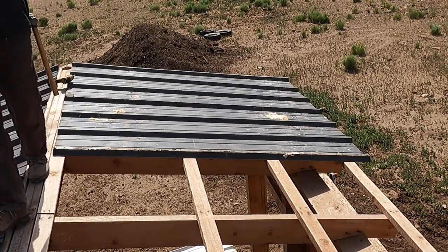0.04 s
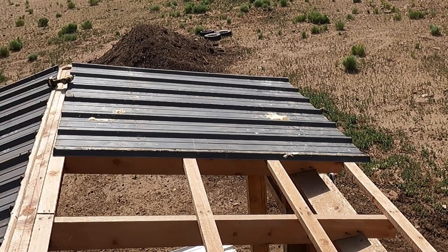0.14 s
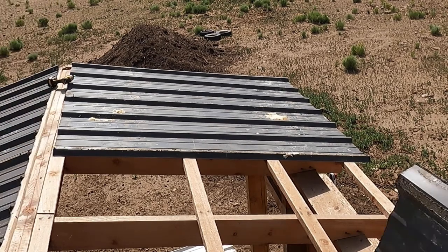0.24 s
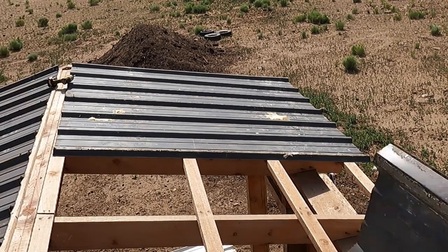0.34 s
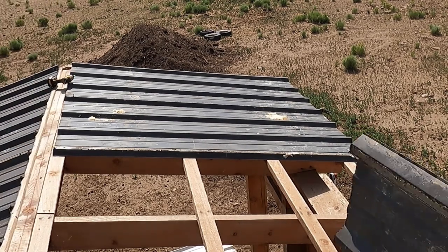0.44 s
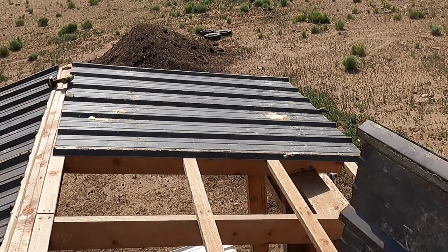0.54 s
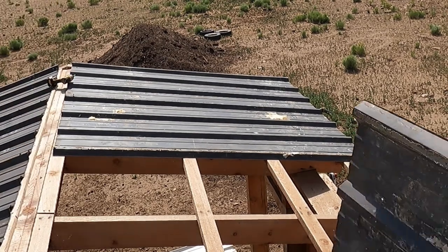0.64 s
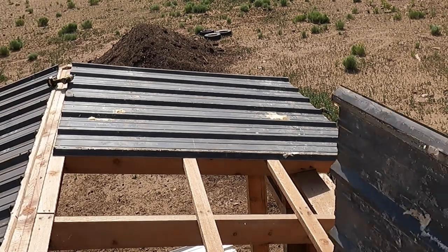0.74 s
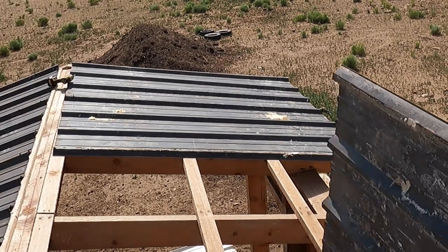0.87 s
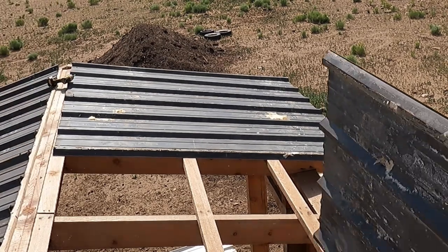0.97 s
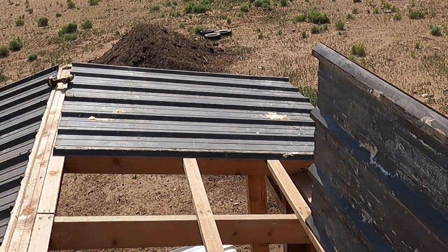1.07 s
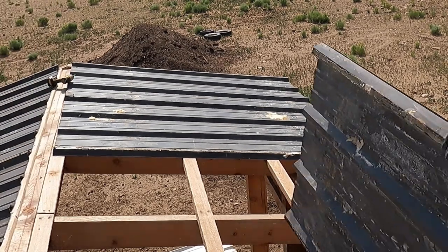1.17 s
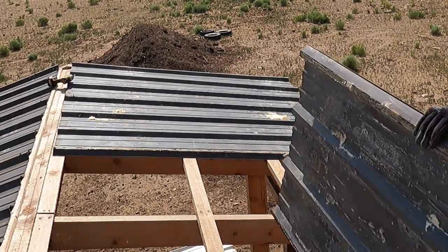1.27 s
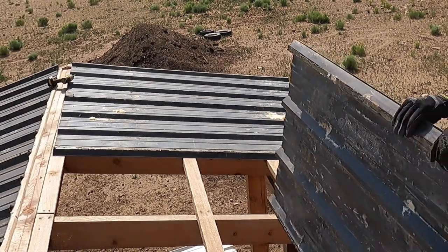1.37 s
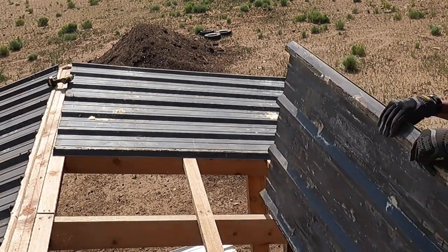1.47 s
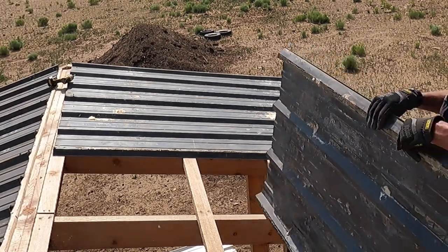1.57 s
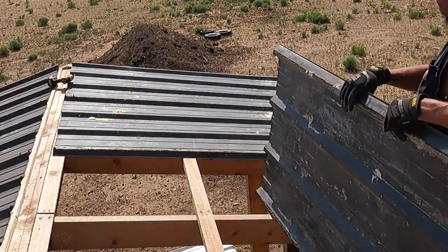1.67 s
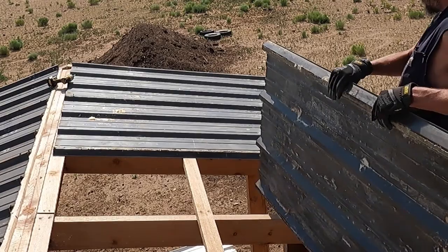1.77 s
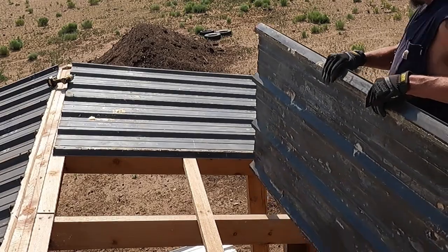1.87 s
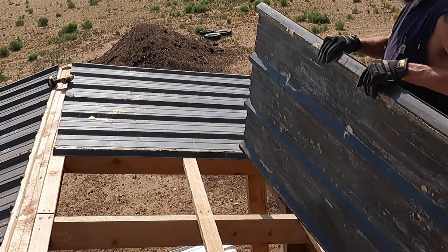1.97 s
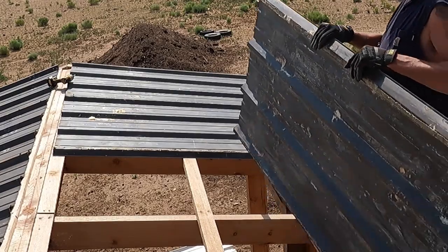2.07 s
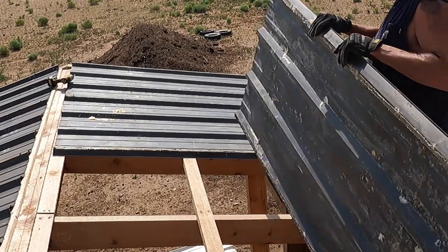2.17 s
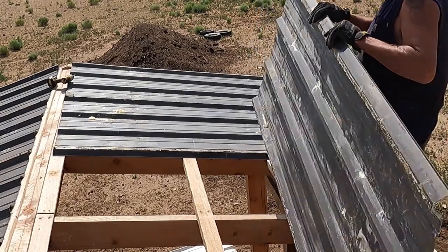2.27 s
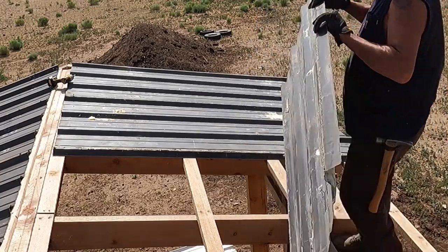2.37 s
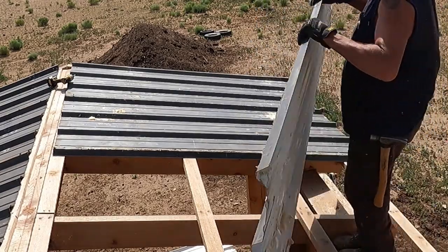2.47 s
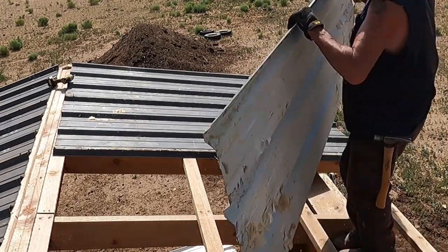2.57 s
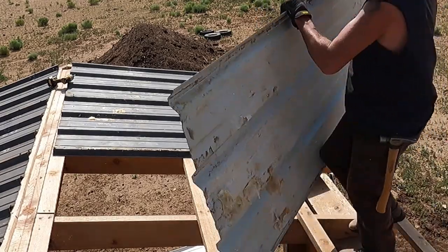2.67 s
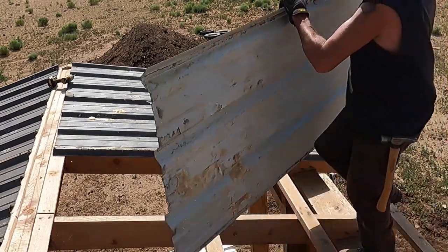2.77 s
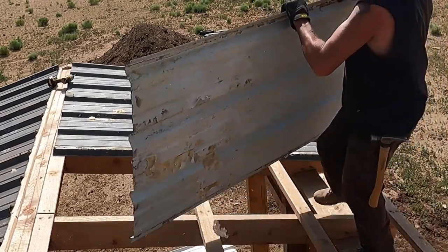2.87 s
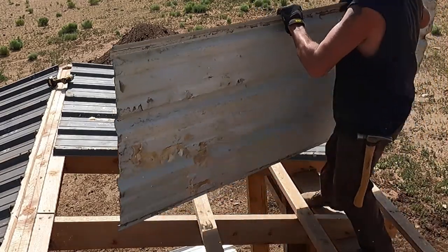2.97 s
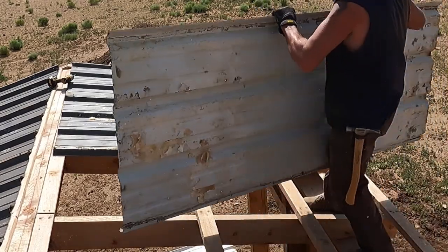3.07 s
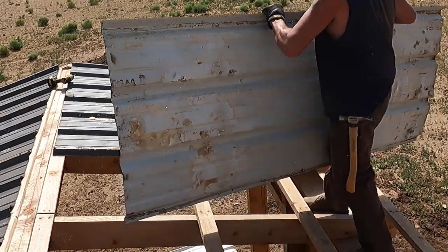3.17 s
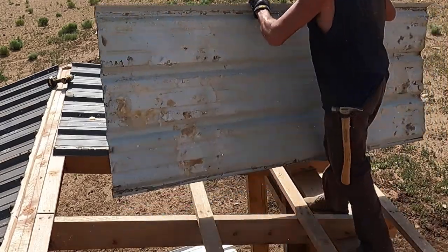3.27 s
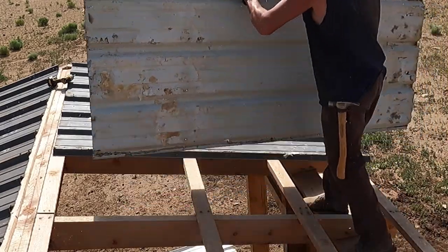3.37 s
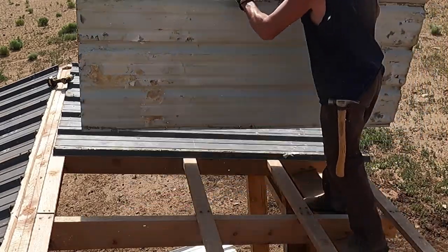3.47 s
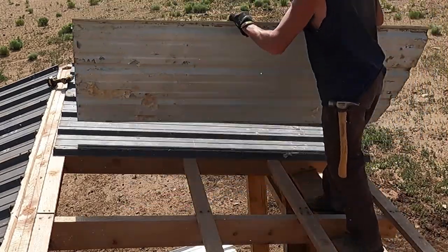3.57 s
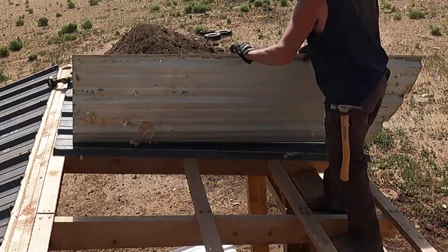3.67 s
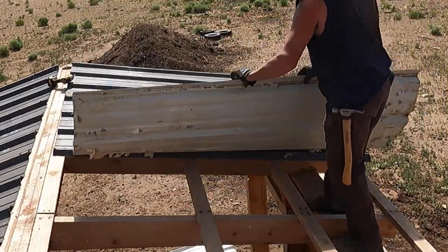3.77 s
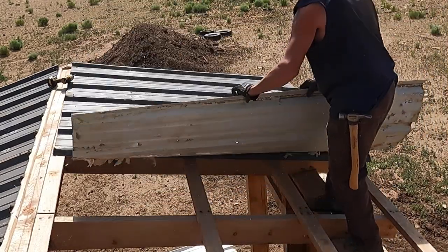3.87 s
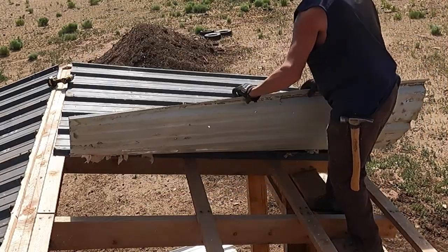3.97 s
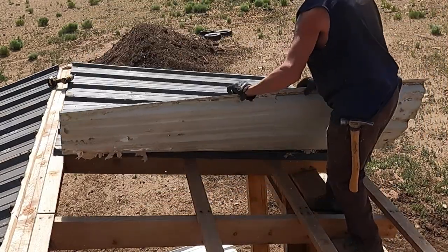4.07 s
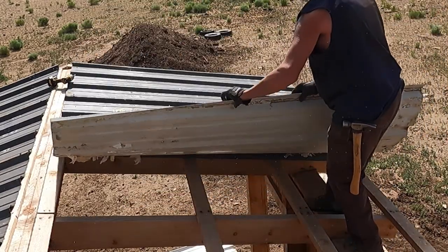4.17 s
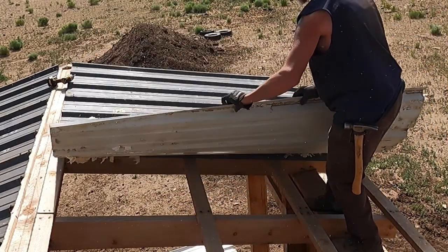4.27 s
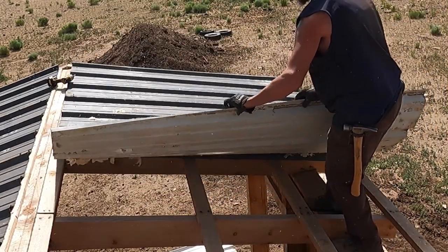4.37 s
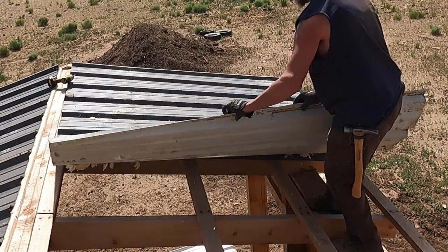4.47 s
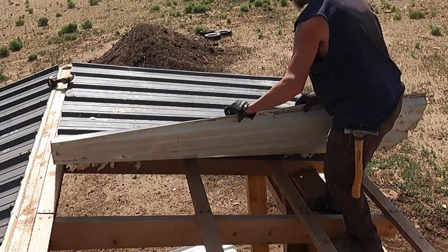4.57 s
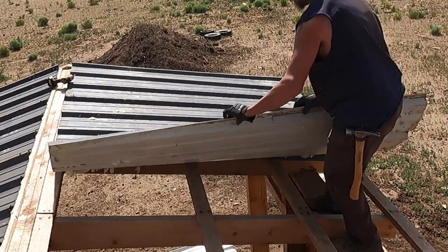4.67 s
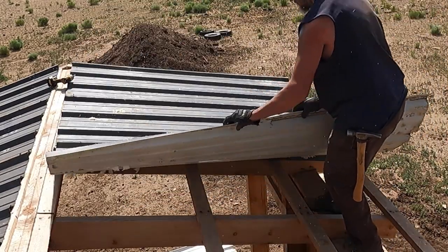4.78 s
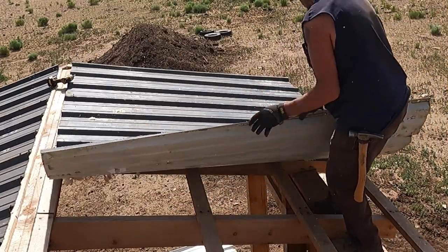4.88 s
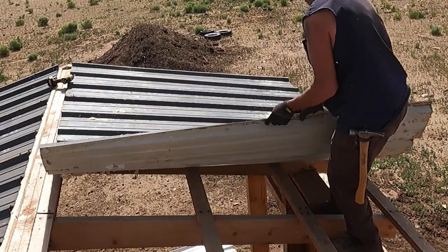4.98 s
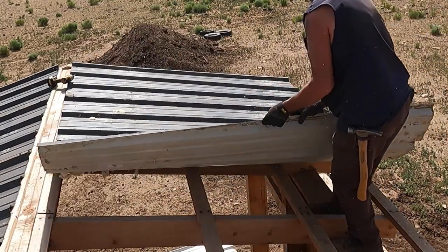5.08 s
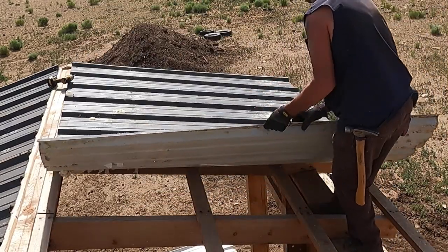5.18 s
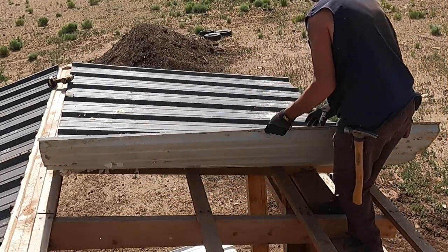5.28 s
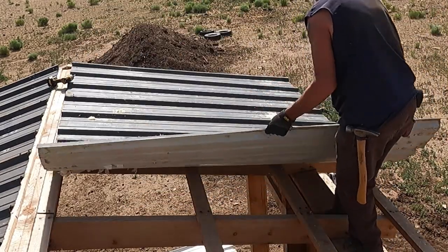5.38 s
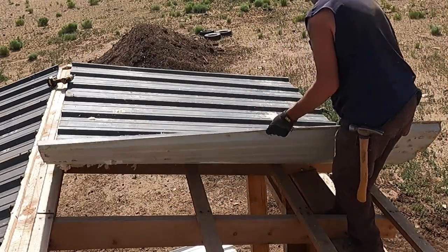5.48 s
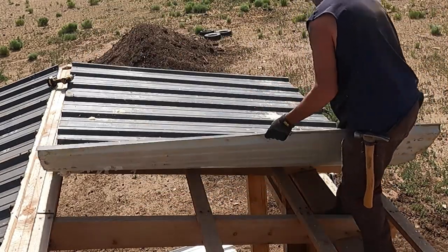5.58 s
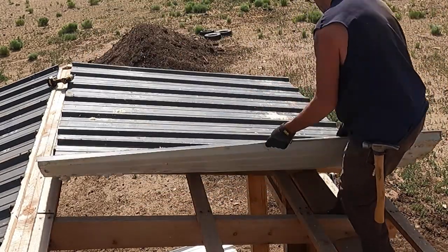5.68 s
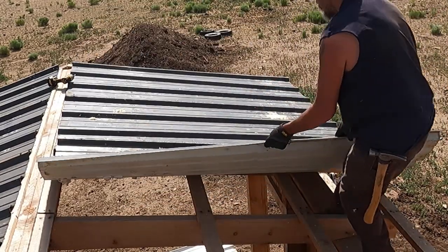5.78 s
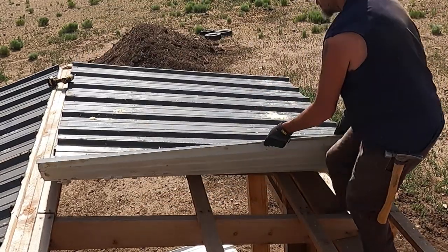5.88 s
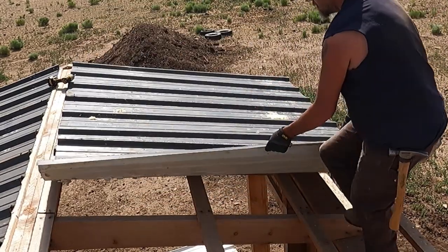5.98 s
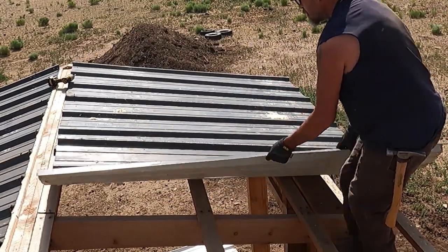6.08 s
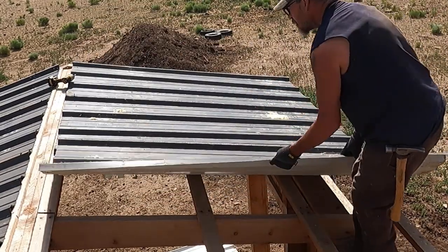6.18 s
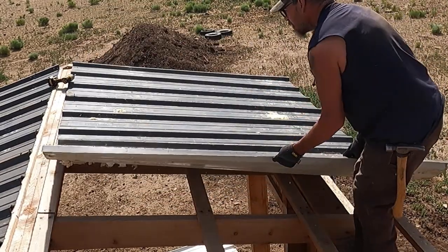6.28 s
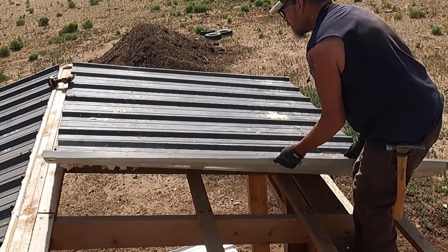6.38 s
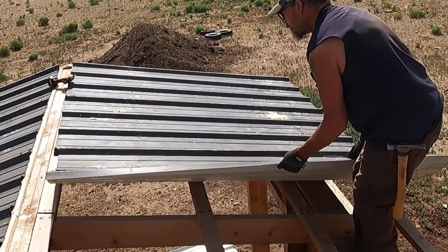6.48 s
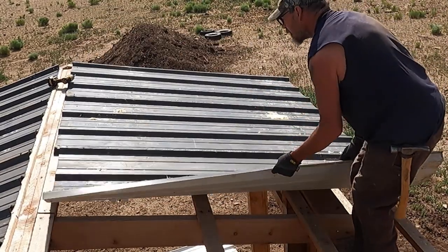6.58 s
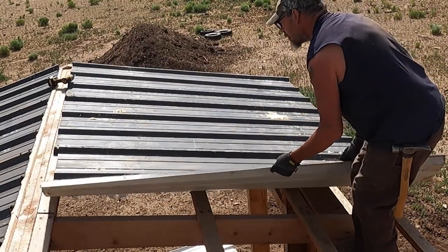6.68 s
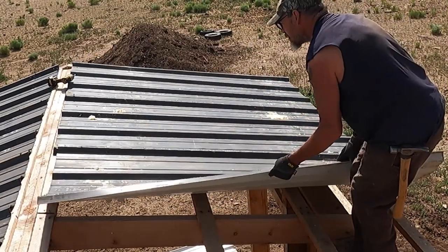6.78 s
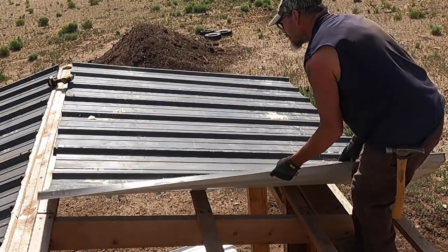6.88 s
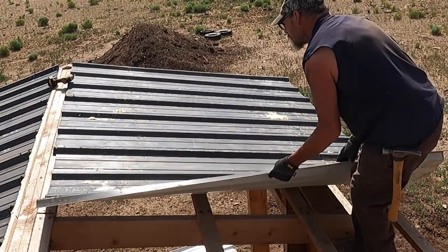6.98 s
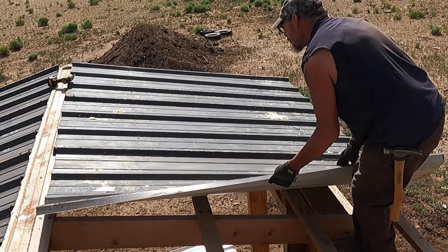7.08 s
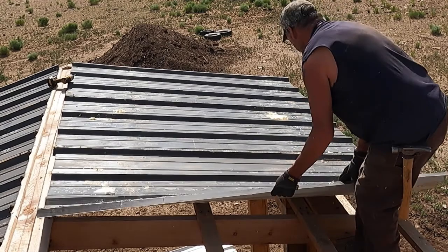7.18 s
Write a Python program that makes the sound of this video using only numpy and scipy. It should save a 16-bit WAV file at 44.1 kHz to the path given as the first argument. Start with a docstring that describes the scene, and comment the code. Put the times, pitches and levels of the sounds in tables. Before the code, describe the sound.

A thin ribbed metal sheet is handled outdoors on a timber frame. It opens with light tinny rattles and a scrape, then a hollow ringing wobble. After a quieter turn it slams down in a cluster of bright clanks with a tiny shrill squeal, then scrapes into place with dull wooden knocks and a late damped clatter. Low wind gusts rumble against the close microphone over faint open air.

```python
"""Steel roofing sheet manhandled onto a roof

A thin ribbed steel sheet is lifted, swung round, dropped on a roof and pushed into place, outdoors.
Blows excite a random crowd of bending modes plus a few strong ones, more or less damped from blow
to blow. Sliding drives the same modes with friction grains; squeal and whistles are unsteady sines.
Knocks, boots and short rasps are resonant noise; wind and open air are shaped noise."""
import sys
import numpy as np
from scipy import signal
from scipy.fft import rfft, irfft, next_fast_len
from scipy.io import wavfile
from scipy.ndimage import uniform_filter1d, map_coordinates

SR = 44100
rng = np.random.default_rng(int(sys.argv[2]) if len(sys.argv) > 2 else 0)


def materialize(psi):
    """Save the field psi as 16-bit PCM at rate SR to the path in sys.argv[1].

    A 1-D psi becomes a single channel; in a 2-D psi each row is a channel.
    """
    bounded = np.clip(np.atleast_2d(psi).T, -1, 1)
    quanta = np.round(bounded * 32767).astype(np.int16)
    wavfile.write(sys.argv[1], SR, quanta)


N = 319284
TIME = np.arange(N) / SR  # s

# spectrum of the sheet's crowd of weaker modes: pitch_hz, relative density_db (dB per Hz)
STEEL_SPECTRUM = [(50, -18), (130, -12), (280, -3.5), (550, 1), (1200, 1), (2500, -4), (3700, -9),
                  (4800, -12.5), (6500, -14), (10000, -23.5), (15500, -29.5)]


def amp(db):
    """Turns decibels into a gain."""
    return 10 ** (np.asarray(db) / 20)


def unit(x):
    """Scales to rms 1."""
    return x / np.sqrt(np.mean(x ** 2) + 1e-20)


def read(points, hz):
    """Reads a table on a log-frequency axis."""
    f, value = np.transpose(points)
    return np.interp(np.log(hz + .1), np.log(f), value)


def follow(rows):
    """Gives a curve's columns at every sample, then a gate that is open while it lasts."""
    s, *columns = np.transpose(rows)
    gate = np.clip(np.minimum(TIME - s[0], s[-1] - TIME) / 0.02 + 1, 0, 1)  # 20 ms fades outside the curve
    return [np.interp(TIME, s, column) for column in columns] + [gate]


def add(mix, start_s, sound):
    """Mixes a sound in at its start time, cut at the end of the scene."""
    part = mix[round(start_s * SR):][:len(sound)]
    part += sound[:len(part)]


def colour(x, spectrum):
    """Filters x by a spectrum table, at rms 1."""
    size = next_fast_len(len(x))
    gain = amp(read(spectrum, np.fft.rfftfreq(size, 1 / SR)))
    return unit(irfft(rfft(x, size) * gain, size)[:len(x)])


def drift(rate_hz):
    """Smooth random wander of rms 1, with little movement faster than about rate_hz."""
    size = next_fast_len(N)
    fade = np.exp(-(np.fft.rfftfreq(size, 1 / SR) / rate_hz) ** 2)
    return unit(irfft(rfft(rng.standard_normal(size)) * fade, size)[:N])


def steady(x):
    """Evens out the chance swells of a low noise."""
    power = uniform_filter1d(uniform_filter1d(x ** 2, SR // 8), SR // 16)
    return x / np.sqrt(power + .05)


def contacts(size, per_s, spread_db):
    """Tiny random impacts of uneven strength and either sign."""
    strength = amp(spread_db * np.minimum(rng.exponential(1, size), 4))
    sizes = strength * rng.choice([-1., 1.], size)
    return sizes * (rng.random(size) < per_s / SR)


def resonate(x, hz, sharpness):
    """Passes x through one resonance, at rms 1."""
    b, a = signal.iirpeak(hz, max(sharpness, 1), SR)
    return unit(signal.lfilter(b, a, x))


def tone(rows, jitter, jitter_hz, flutter_db):
    """An unsteady sine on a pitch and level curve; its pitch and level wander separately."""
    hz, db, gate = follow(rows)
    turns = np.cumsum(hz * (1 + jitter * drift(jitter_hz))) / SR
    level = gate * amp(db + flutter_db * drift(jitter_hz))
    return level * np.sqrt(2) * np.sin(2 * np.pi * turns)


def wind(eddy_db=6.5, buffet_db=-18, lump_db=1.6, levelling=0.79, buffet_growth=0.77):
    """Eddies push on the microphone in uneven lumps; strong wind breaks into finer buffeting."""
    # strength of the wind: time_s, strength_db
    gusts = [(0.0, -22.5), (0.13, -38.5), (0.28, -13.5), (0.47, -30.5), (0.6, -17.5), (0.83, -15.5),
             (0.97, -30.5), (1.3, -43.5), (1.68, -36), (2.35, -52), (2.8, -23.5), (3.25, -27),
             (3.45, -33.5), (4.1, -23.5), (5.27, -36), (5.45, -20.5), (5.9, -34), (6.3, -20), (6.7, -21.5),
             (7.24, -38.5)]
    # slow eddies: pitch_hz, relative density_db (dB per Hz)
    eddy_spectrum = [(1.5, -43), (5, 13), (15, 1.5), (24, -5), (41, -12), (70, -44.5), (140, -43),
                     (300, -78.5), (900, -100)]
    # finer buffeting of strong gusts: pitch_hz, relative density_db (dB per Hz)
    buffet_spectrum = [(30, -21), (60, 7.5), (100, -8.5), (160, -14), (300, -22), (800, -42), (3000, -73)]
    breakup_db = -20  # above this strength the eddies level off and the buffeting grows
    strength_db, _ = follow(gusts)
    excess_db = np.maximum(strength_db - breakup_db, 0)
    eddies = steady(colour(rng.standard_normal(N), eddy_spectrum))
    buffet = steady(colour(rng.standard_normal(N), buffet_spectrum))
    flow = amp(eddy_db - levelling * excess_db) * eddies
    flow += amp(buffet_db + buffet_growth * excess_db) * buffet
    return amp(strength_db + lump_db * drift(rate_hz=12)) * flow


def open_air(level_db=-59.0, waver_db=0.8):
    """Outdoor background: shaped noise whose level wavers slightly."""
    # spectrum of the air: pitch_hz, relative density_db (dB per Hz)
    air_spectrum = [(40, -2.5), (150, 3.5), (400, 2.5), (1000, -3), (2500, -8), (4000, -14.5), (8000, -21),
                    (15000, -26.5)]
    air = colour(rng.standard_normal(N), air_spectrum)
    return amp(level_db) * air * amp(waver_db * drift(rate_hz=8.6))


def sheet_modes(modes_per_hz=.11, uneven_db=2.5):
    """Short-time spectra of the sheet's crowd of modes, all sounding without loss."""
    hz = np.fft.rfftfreq(2 * SR, 1 / SR)
    place = np.arange(len(hz)) * modes_per_hz / 2
    spacing = np.cumsum(rng.uniform(.3, 1.7, len(hz)))
    # a plate's modes lie about evenly in frequency
    present = np.diff(np.searchsorted(spacing, place), prepend=0)
    strength = amp(uneven_db * rng.standard_normal(len(hz)))
    lines = present * strength * np.exp(2j * np.pi * rng.random(len(hz)))
    endless = colour(irfft(lines), STEEL_SPECTRUM)[:SR * 3 // 2]
    return signal.stft(endless, SR, nperseg=512)


def damped(t60, ring, evenness=0.26):
    """Scales decay times: ring above 1 lengthens, below 1 shortens, most for the longest-ringing modes."""
    return t60 * ring ** (t60 ** evenness)


def sheet_ring(crowd, ring, flash_db=-1, flash_s=0.029, crack_db=2, crack_s=0.0035):
    """The crowd's answer to one tap, each pitch dying at its own damped rate."""
    # decay of the crowd at ring 1: pitch_hz, t60_s
    crowd_decay = [(150, 1.4), (530, 2.27), (1300, 0.93), (1900, 0.82), (2800, 0.51), (5000, 0.5),
                   (9000, 0.36), (15000, 0.84)]
    hz, t, z = crowd
    t60 = damped(read(crowd_decay, hz), ring)
    out = signal.istft(z * amp(-60 * t / t60[:, None]), SR, nperseg=512)[1]
    out = out[:int(min(ring, 2) * 2 * SR)]
    age = np.arange(len(out)) / SR
    # a crack at the point of contact, then loud until the waves have spread over the whole panel
    crack = amp(crack_db) * np.exp(-age / crack_s)
    flash = amp(flash_db) * np.exp(-age / flash_s)
    return out * (1 + crack + flash)


def boom(t, ring):
    """The sheet's strongest bending modes as decaying sines of random phase."""
    # strong modes at ring 1: pitch_hz, relative level_db, t60_s
    strong_modes = [(290, -4, 1.3), (409, -11, 2.7), (540, 3, 1.35), (563, -7, 1.5), (636, -14, 1.4),
                    (685, -9, 1.4), (727, -12, 2.2), (818, 2, .85), (862, -5, 1.1), (935, -8, 1.3),
                    (1082, 0, .95), (1249, 0, .9), (1349, -2, 1.0), (1439, -3, 1.0), (1519, -6, .8),
                    (1645, -2, .85), (1743, -9, .7), (1940, -6, .6), (2177, -9, .65), (2320, -2, .65),
                    (2380, -3, .55), (2529, -1, .55), (2692, -1, .6), (3280, -10, .5), (3760, -10, .5),
                    (4700, -14, .5), (6245, -14, .4), (6369, -13, .4), (6626, -14, .4)]
    out = 0
    for hz, db, t60 in strong_modes:
        decay = amp(db - 60 * t / damped(t60, ring))
        out = out + decay * np.sin(2 * np.pi * (hz * t + rng.random()))
    return out


def blows(crowd, level_db=-3, strong_db=-10.5, chatter_per_s=900, first_share=0.31):
    """Each blow is a first contact and a short chatter of the loose edge; its push swells the strong modes."""
    # blows on the sheet, and at 4.15 s a long bright rattle of the edge within the scrape: start_s, relative
    # level_db, extra bass_db, extra treble_db, relative boom_db of the strong modes, chatter_s (decay time,
    # held to at least 1 ms)
    blow_table = [(0.199, -36, 3.5, 3, -7.5, 0.0083), (0.222, -29.5, -42, -5.5, -8, 0.0097),
                  (0.479, -37, 1, -3.5, -6, 0.0037), (0.509, -39.5, -7, 4.5, -12, 0.0043),
                  (0.55, -40, -2.5, 4.5, 8, 0.0048), (0.874, -57, 14.5, 2, -1, 0.0033),
                  (1.551, -37, 0, -2.5, -2.5, 0.006), (1.608, -44, 3, -4, 8, 0.046),
                  (1.669, -40, 2, 1.5, -4, 0.0044), (1.709, -25, -6, -9.5, 5, 0.033),
                  (1.720, -29.5, 2.5, -16, 10.5, 0.0062), (1.775, -47.5, -1, 8.5, -15, 0.011),
                  (2.456, -51, -3, 7, -17, 0.0024), (2.502, -33, -6, -1.5, 0.5, 0.0076),
                  (2.535, -41.5, 10, -12, -3, 0.14), (2.705, -48, 9.5, -37, -3.5, 0.0067),
                  (3.158, -31.5, -8.5, 6, 0, 0.00086), (3.706, -32, -9.5, 3, -14.5, .006),
                  (3.719, -18.5, -4, 3.5, -12.5, 0.007), (3.753, -17, -10, 6.5, -15.5, 0.015),
                  (3.772, -15.5, -9, -3, -2, 0.042), (3.815, -28.5, -1, 7, -1, 0.011),
                  (3.952, -29.5, -37, -2.5, -20, 0.01), (4.15, -25.5, -23, -4.5, -3, 0.031),
                  (4.398, -39.5, -2, 0.5, -16, .001), (6.507, -28, -5, -7, -9, 0.0052),
                  (6.544, -38, 4.5, 1, -13, 0.0044), (6.568, -25, -1, -17, -16, 0.0043),
                  (6.673, -32.5, 1, -8.5, -16, 0.0034), (7.132, -50, -3.5, -20, 3, 0.0098)]
    # how freely the sheet rings, above 1 longer, below 1 shorter and more damped: time_s, freedom (ratio)
    freedom = [(0.22, 1.03), (0.5, 0.26), (1.6, 1.55), (1.75, 0.5), (2.7, 1.18), (3.16, 0.44), (3.9, 0.32),
               (6.55, 0.4), (6.7, 0.44)]
    out, t = np.zeros(N), np.arange(SR // 5) / SR
    for s, db, bass_db, treble_db, boom_db, chatter_s in blow_table:
        chatter_s = max(chatter_s, .001)
        ring = max(np.interp(s, *np.transpose(freedom)), .05)
        force = contacts(len(t), chatter_per_s, spread_db=5.5) * np.exp(-t / chatter_s)
        force /= np.linalg.norm(force) + 1e-9
        force[0] += first_share
        sound = signal.fftconvolve(force / np.linalg.norm(force), sheet_ring(crowd, ring))
        age = np.arange(len(sound)) / SR
        swell = 1 - np.exp(-2 * age / chatter_s)
        sound += amp(strong_db + boom_db) * boom(age, ring) * swell
        size = next_fast_len(len(sound))
        balance = [(700, bass_db), (1700, 0.0065), (3000, 0), (7000, treble_db)]  # Hz, dB
        hardness_db = read(balance, np.fft.rfftfreq(size, 1 / SR))
        fade = np.minimum(np.linspace(2, 0, size), 1)  # the second half fades smoothly to silence
        add(out, s, fade * irfft(rfft(sound, size) * amp(level_db + db + hardness_db), size))
    return out


def stroke(start_s, length_s, t60_s):
    """Envelope of one push: rise, easing hold, release."""
    rise_s, ease_db_per_s = 0.061, 11
    age = np.maximum(TIME - start_s, 0)
    fall_db = ease_db_per_s * age + 60 * np.maximum(age - length_s, 0) / t60_s
    return np.minimum(age / rise_s, 1) * amp(-fall_db)


def slides(crowd, grind_db=-2, bite_db=1.5, stick_db=3.0, strong_db=-7, ring=0.35):
    """The edge catches and slips over timber and steel: grains that hiss and drive the panel."""
    # strokes of the edge: start_s, length_s, relative pressure_db on the panel, relative bite_db of the edge
    strokes = [(0.455, 0.3, -39.5, -55), (0.682, 0.08, -51, -51.5), (0.877, 0.065, -49.5, -43),
               (1.0, 0.07, -49.5, -62.5), (2.284, .11, -63, -63), (2.528, 0.046, -43, -51),
               (3.907, 0.046, -35, -43), (4.025, 0.16, -38, -41), (4.135, 0.045, -32.5, -58),
               (4.325, 0.11, -47.5, -54), (4.6, 0.052, -52, -54), (4.82, 0.15, -62, -64.5),
               (5.783, 0.035, -56, -56), (5.851, 0.044, -51, -54.5), (6.395, 0.093, -57, -59),
               (6.496, 0.094, -36, -45.5), (6.697, 0.078, -50.5, -56.5), (6.971, 0.071, -54, -64),
               (7.129, 0.041, -46.5, -54)]
    # the panel's voice under friction: pitch_hz, relative density_db (dB per Hz)
    grind_spectrum = [(100, 2), (300, -16.5), (700, 0.5), (1100, -3), (1700, 5), (2700, -6), (4000, -8.5),
                      (6000, -41), (12000, -55)]
    # the hiss of the edge itself: pitch_hz, relative density_db (dB per Hz)
    bite_spectrum = [(1500, -4), (3500, 3), (6000, 4), (8000, -0.5), (11000, -7), (15500, -13)]
    panel_t60_s, edge_t60_s = 0.43, 0.25  # the panel outlasts the hiss of the edge
    pressure = sum(amp(db) * stroke(s, length, panel_t60_s) for s, length, db, _ in strokes)
    bite = sum(amp(db) * stroke(s, length, edge_t60_s) for s, length, _, db in strokes)
    grains = contacts(N, per_s=1600, spread_db=0.5) * amp(stick_db * drift(rate_hz=33))
    tap = sheet_ring(crowd, ring)
    tap = tap + amp(strong_db) * boom(np.arange(len(tap)) / SR, ring)
    panel = signal.oaconvolve(grains, tap)[:N]
    # the inverse spectrum keeps the resonances; friction sets the broad colour
    panel = colour(panel, [(hz, -db) for hz, db in STEEL_SPECTRUM])
    grind = colour(panel + .5 * unit(grains), grind_spectrum)
    hiss = colour(2.0 * panel + unit(grains), bite_spectrum)
    return amp(grind_db) * pressure * grind + amp(bite_db) * bite * hiss


def flex(x):
    """Bending stiffens and slackens the sheet, so all its modes waver slightly, as a moving delay."""
    lag = np.cumsum(.0012 * drift(rate_hz=5))  # samples
    lag -= uniform_filter1d(lag, SR // 2)
    return map_coordinates(x, [np.arange(N) + lag], order=3)


def rasps(sharpness=4.6, dry_db=-7):
    """Short rasps: brief strokes of grainy friction, each with one resonance."""
    # rasps: start_s, length_s, level_db of the resonance, pitch_hz
    rasp_table = [(0.752, 0.088, -58, 3730), (1.389, 0.078, -67.5, 6900), (2.085, 0.062, -71.5, 6900),
                  (3.523, 0.24, -63.5, 3730), (3.53, 0.051, -60.5, 4670), (5.186, 0.058, -58.5, 2150),
                  (5.28, 0.11, -48.5, 1940), (5.298, 0.071, -63, 4350), (5.413, 0.076, -58, 3930)]
    out = np.zeros(N)
    for s, length, db, hz in rasp_table:
        grains = contacts(SR // 2, per_s=1800, spread_db=-1.5)[:int(length * SR)]
        rasp = resonate(grains, hz, sharpness)
        rasp += amp(dry_db) * colour(grains, [(300, -8), (hz, 0), (15000, -18)])
        add(out, s, amp(db) * rasp * signal.windows.tukey(len(rasp), .7))
    return out


def timber(t, tilt, hz, ring_db=-3, sharpness=9, t60_s=0.1):
    """A dead knock on wood: decaying noise with one resonance, tilted in dB per octave about 1 kHz."""
    # timber's response: pitch_hz, relative density_db (dB per Hz)
    timber_spectrum = [(80, -13), (250, 10), (450, 10.5), (680, 12.5), (1100, 4), (1800, 0.5),
                       (2600, -15.5), (4500, -24.5), (9000, -47), (15000, -62.5)]
    tilted = [(f, db + tilt * np.log2(f / 1000)) for f, db in timber_spectrum]
    wood = colour(rng.standard_normal(len(t)), tilted)
    wood += amp(ring_db) * resonate(rng.standard_normal(len(t)), hz, sharpness)
    return amp(-60 * t / t60_s) * wood


def knocks(level_db=-0.5, thud_hz=71, thud_t60=0.27, rise_s=0.00093):
    """Light knocks on the frame, and dull ones with the low thud of the rafter under a boot."""
    # tools and knuckles on the frame: start_s, relative level_db, brightness (dB per octave), pitch_hz
    frame_knocks = [(1.202, -42.5, 4.5, 700), (1.33, -55, -10, 596), (1.387, -52.5, 8, 880),
                    (1.43, -51, 3, 870), (2.152, -47, -5, 900), (4.757, -51.5, 10, 2235),
                    (4.945, -51, 4, 1600), (5.19, -49, 11.5, 4100), (5.275, -45, 10.5, 2730),
                    (5.409, -44.5, 8.5, 876), (5.444, -39.5, -3, 1520), (5.528, -46.5, 12.5, 2450),
                    (5.599, -37, 5, 695), (6.121, -35.5, -0.5, 1760), (6.164, -49, -8.5, 650)]
    # boots coming down on the rafters: start_s, relative level_db, thud_db
    boot_steps = [(0.806, -44, -19.5), (2.793, -41, -36), (2.852, -40, -42), (6.308, -42, -26.5)]
    boot_tilt, boot_hz = -9.5, 643  # a sole is dull (dB per octave) and sounds the rafter's resonance
    out, t = np.zeros(N), np.arange(SR // 3) / SR
    rise = 1 - np.exp(-t / rise_s)
    thud = amp(-60 * t / thud_t60) * np.sin(2 * np.pi * thud_hz * t)
    for s, db, tilt, hz in frame_knocks:
        add(out, s, rise * amp(level_db + db) * timber(t, tilt, hz))
    for s, db, thud_db in boot_steps:
        step = amp(level_db + db) * timber(t, boot_tilt, boot_hz)
        add(out, s, rise * (step + amp(thud_db) * thud))
    return out


def whistles():
    """Faint high whistles: unsteady gliding sines."""
    # one curve per whistle: time_s, pitch_hz, level_db
    whistle_curves = [
        [(3.23, 8800, -77), (3.36, 6800, -70), (3.39, 6650, -77)],
        [(3.45, 7950, -77), (3.54, 7900, -72)],
        [(3.53, 5020, -70), (3.7, 5000, -66)],
    ]
    return sum(tone(rows, jitter=.011, jitter_hz=200, flutter_db=3.5) for rows in whistle_curves)


def squeal():
    """The dragged edge squeals: one high sine, roughened by fast jitter."""
    # squeal curve: time_s, pitch_hz, level_db
    squeal_curve = [(3.745, 8600, -41), (3.76, 8400, -35), (3.775, 8480, -28), (3.795, 8660, -19),
                    (3.81, 8590, -31.5), (3.832, 8660, -31), (3.855, 8600, -52.5)]
    return tone(squeal_curve, jitter=0.014, jitter_hz=262, flutter_db=4)


def scene():
    """Sums all the sources; blows and slides share one sheet and its flexing."""
    crowd = sheet_modes()
    sheet = flex(blows(crowd) + slides(crowd)) + squeal()
    return (wind() + open_air() + sheet + rasps() + knocks() + whistles())[None]


def record(dry):
    """The recorder's band limit: a steep low-pass."""
    edge_hz = 15750
    lowpass = signal.firwin(511, edge_hz, window=("kaiser", 8), fs=SR)
    return signal.oaconvolve(dry, lowpass[None], "same")


dry = scene()
out = record(dry)
materialize(out)
```